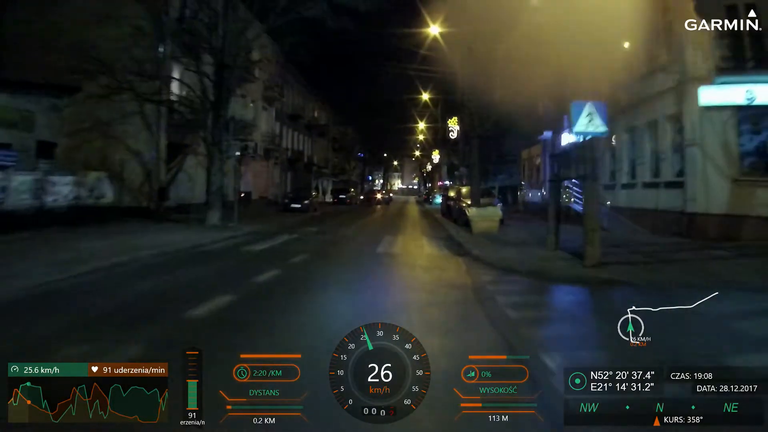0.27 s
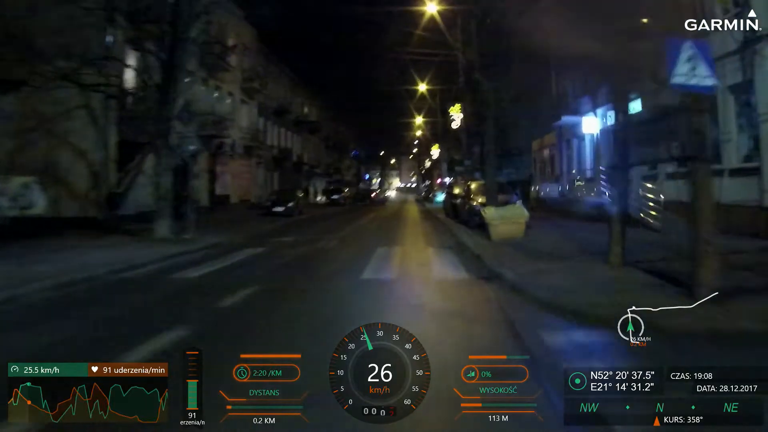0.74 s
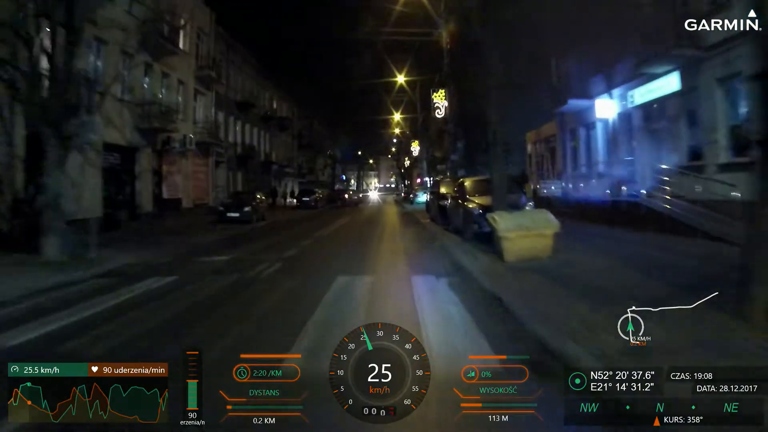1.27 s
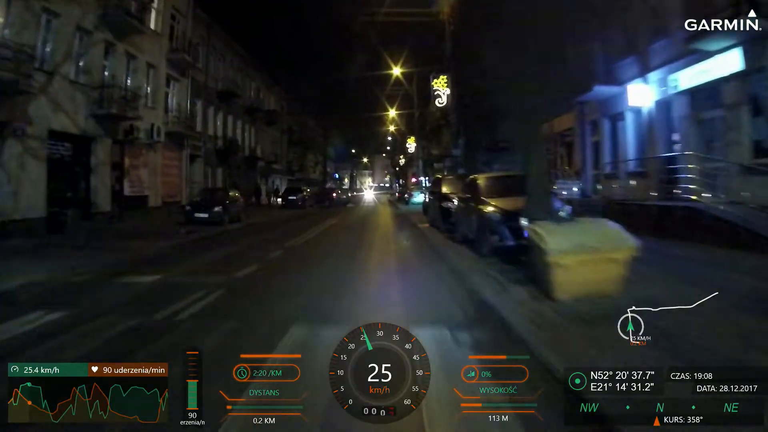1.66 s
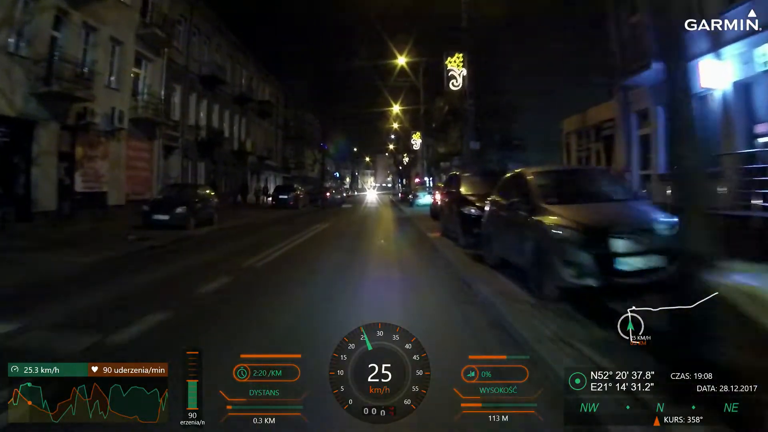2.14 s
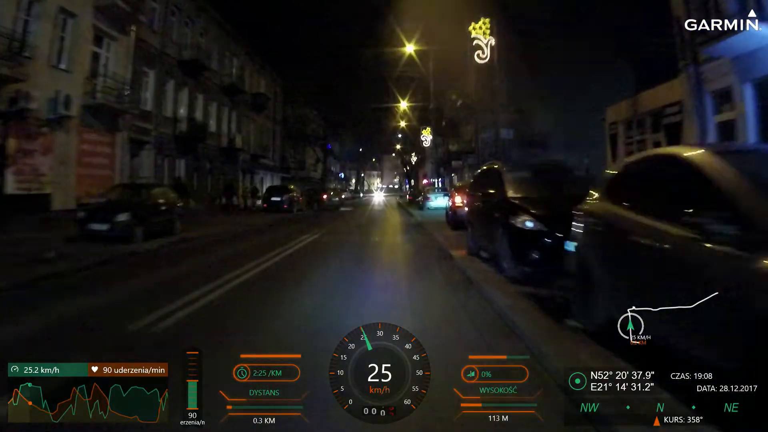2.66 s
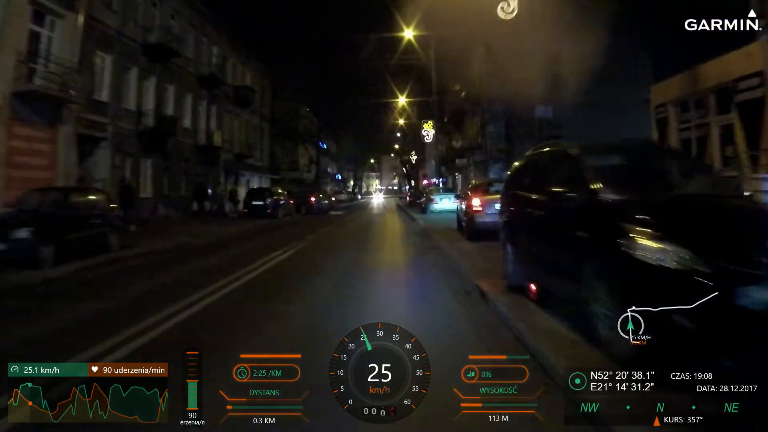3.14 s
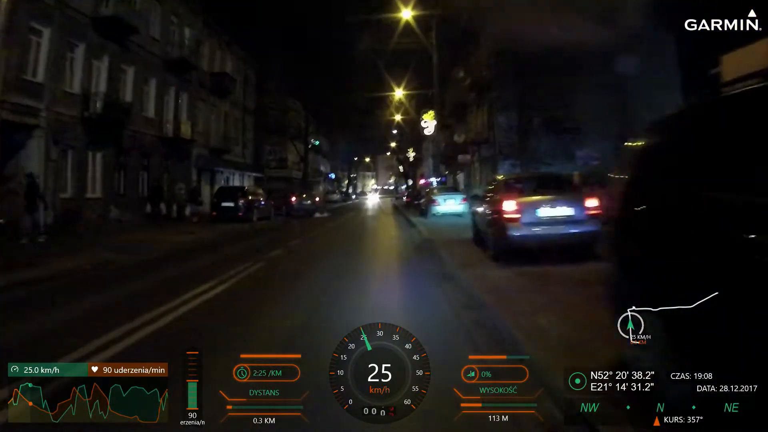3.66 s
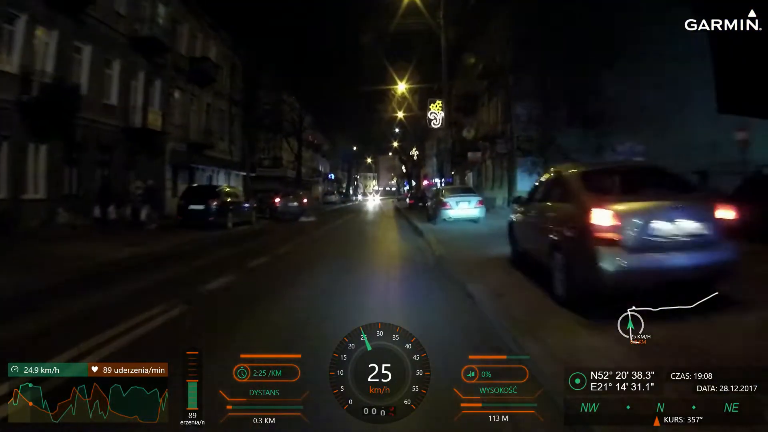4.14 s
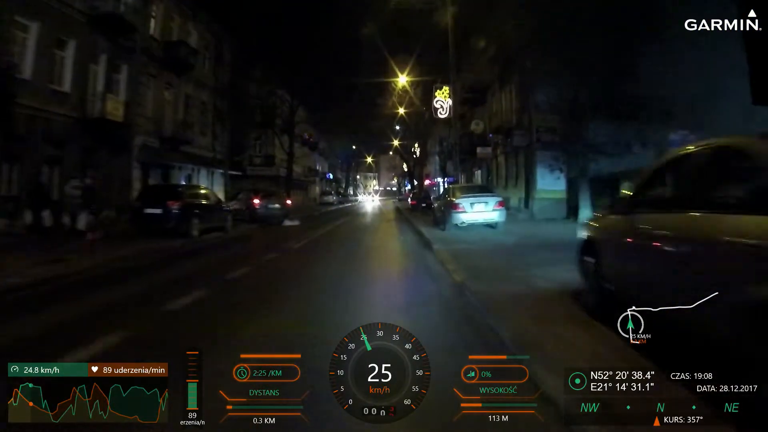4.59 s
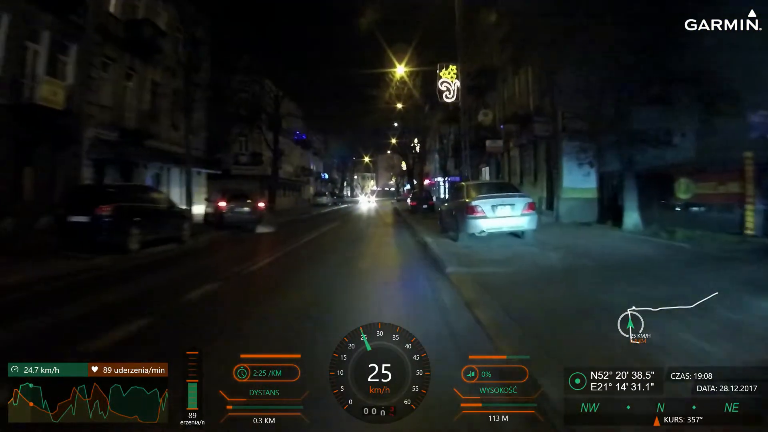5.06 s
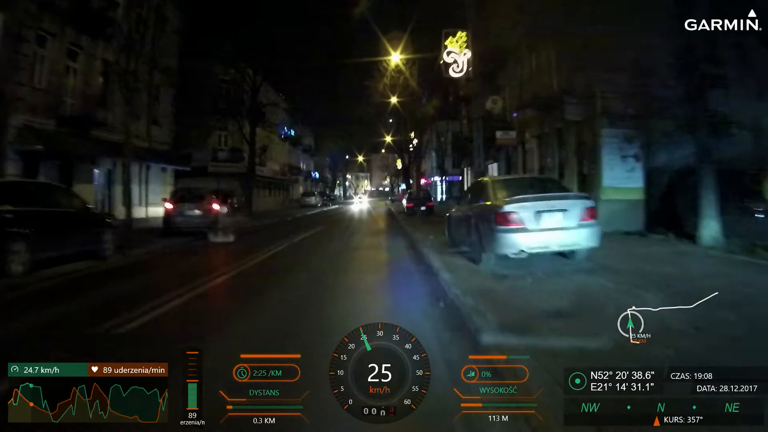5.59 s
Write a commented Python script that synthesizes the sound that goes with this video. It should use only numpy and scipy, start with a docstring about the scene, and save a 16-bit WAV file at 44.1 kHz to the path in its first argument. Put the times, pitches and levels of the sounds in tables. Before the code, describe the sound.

A steady scooter ride along a wet night street, recorded close and dry on the vehicle itself. Two neighbouring motor tones beat and surge over bumps, with buzzy overtones. Behind them run hollow road noise, hissing spray and low wind. Faint high electronic singing comes and goes, sprinkled with sharp little clicks; the tyre hiss turns brighter late on.

```python
"""A throbbing motor hum in a rush of tyre and road: an electric scooter rolls at an even speed along a wet
street, heard from a microphone fixed to it. The hub motor is a sum of sines on multiples of one base rate, its
main tones swelling with shaft and wheel. Frame, tyre hiss and wind are flickering bands of noise. The motor
controller sings faintly in the treble through narrow resonances; grit and drops tick on the housing."""
import sys
import numpy as np
from scipy import signal
from scipy.io import wavfile
from scipy.ndimage import uniform_filter1d

SR = 44100
rng = np.random.default_rng(int(sys.argv[2]) if len(sys.argv) > 2 else 0)


def to_wav(s):
    """Save 16-bit WAV."""
    ch = np.atleast_2d(s).T  # columns
    pcm = np.round(np.clip(ch, -1, 1) * 32767)  # PCM
    wavfile.write(sys.argv[1], SR, pcm.astype(np.int16))


N = 256662


def from_db(db):
    """Amplitude gain is ten to the power of decibels over 20."""
    return 10 ** (np.asarray(db) / 20)


def rms_one(x):
    """Normalise to unit effective value: divide by the root of the mean square."""
    return x / np.sqrt(np.mean(x ** 2) + 1e-20)


def in_time(rows):
    """Linear interpolation in time: each column after the first becomes one value per sample."""
    s, *columns = np.transpose(rows)
    return [np.interp(np.arange(N) / SR, s, c) for c in columns]


def drift(rate_hz):
    """Slow random fluctuation: white noise through two equal one-pole low-passes, rms 1."""
    step = 40   # samples between the slow values
    r = np.exp(-2 * np.pi * rate_hz * step / SR)
    white = rng.standard_normal(N // step + 2002)
    slow = signal.lfilter([1], [1, -2 * r, r * r], white)[2000:]   # drop the filter's start
    return np.interp(np.arange(N) / step, np.arange(len(slow)), rms_one(slow))


def band(x, low_hz, high_hz):
    """Butterworth band-pass: maximally flat between two corner frequencies."""
    return signal.sosfilt(signal.butter(2, [low_hz, high_hz], "band", fs=SR, output="sos"), x)


def banded_noise(spectrum, count, own_db, rate_hz):
    """Spectral shaping: log-spaced noise bands, each with its own level fluctuation; total rms 1."""
    hz, level_db = np.transpose(spectrum)
    edges = np.geomspace(hz[0], hz[-1], count)
    white = rng.standard_normal((2, N))   # neighbouring bands take different noise
    out = 0
    for k, (low, high) in enumerate(zip(edges, edges[1:])):
        centre_db = np.interp(np.log(low * high) / 2, np.log(hz), level_db)
        flicker_db = own_db * drift(rate_hz)
        out = out + from_db(centre_db + flicker_db) * band(white[k % 2], low, high)
    return rms_one(out)


def resonant_noise(peaks):
    """Resonance: noise passed twice through a two-pole filter per (pitch, width, level) row; rms 1."""
    out = 0
    for hz, width_hz, db in peaks:
        r = np.exp(-np.pi * width_hz / SR)
        poles = [1, -2 * r * np.cos(2 * np.pi * hz / SR), r * r]
        once = signal.lfilter([1, 0, -1], poles, rng.standard_normal(N))
        twice = signal.lfilter([1], poles, once)
        out = out + from_db(db) * rms_one(twice)
    return rms_one(out)


def base_cycles():
    """Phase is the running integral of frequency: cycles of the motor base rate gone by."""
    # motor base rate: columns [start_s, pitch_hz]
    speed = [(0, 91.0), (.6, 91.2), (2.3, 91.2), (2.8, 90.9), (4, 90.7), (5.82, 90.3)]
    return np.cumsum(in_time(speed)[0]) / SR


def swell(name):
    """Periodic modulation: a level swing in dB, once per wheel turn and once per motor shaft turn."""
    # swing of each layer: columns [wheel_db, wheel_peak_turns, shaft_db, shaft_peak_turns]
    swings = {"fifth": (0.7, 0.89, 1.85, 0.41), "sixth": (3.7, 0.96, 0.67, 0.3),
              "frame": (1.04, 0.69, 0.58, 0.29), "hiss": (1.9, 0.68, 0.21, 0.14),
              "whine": (1.9, 0.65, 0.97, .32)}
    wheel_db, wheel_at, shaft_db, shaft_at = swings[name]
    wheel_turns = base_cycles() / 31.25   # base cycles in one wheel turn
    shaft_turns = base_cycles() / 9       # base cycles in one shaft turn
    wheel_swing = wheel_db * np.cos(2 * np.pi * (wheel_turns - wheel_at))
    shaft_swing = shaft_db * np.cos(2 * np.pi * (shaft_turns - shaft_at))
    return wheel_swing + shaft_swing


def wind():
    """Turbulence: air on the microphone as mainly low-pitched noise of fluctuating level."""
    # shape of the wind spectrum: columns [pitch_hz, level_db per Hz, relative]
    wind_spectrum = [(15, -33), (28, -24), (45, -1), (64, -1.5), (160, 1.5), (227, -3.5), (330, -11)]
    # wind swell: columns [start_s, level_db]
    gust = [(0, -0.5), (5.2, -1), (5.82, 5.5)]
    wind_db = -34.5 + in_time(gust)[0] + 2.1 * drift(7.7)
    return from_db(wind_db) * banded_noise(wind_spectrum, count=12, own_db=0.4, rate_hz=7.1)


def ticks():
    """Impulse excitation: grit and drops click on the housing with short noisy tails, bright and dull."""
    # single ticks: columns [start_s, level_db before filtering, dull_db relative to the bright part]
    tick_rows = [(0.4718, -44, -7), (0.5914, -28, -12), (0.6379, -30, -13), (0.844, -34, -1),
                 (1.023, -29, -4), (1.1657, -34, -5), (1.3575, -42, 8), (1.5725, -22, -13),
                 (1.677, -31, -4), (1.7145, -40, -2), (1.7564, -37, -8), (1.8423, -23.5, -3),
                 (1.916, -35, -15), (2.6274, -30, -13), (2.7924, -45, 9), (2.9628, -23, -2),
                 (3.1916, -39, -17.5), (3.3194, -32, 2), (3.901, -30, -9), (4.0811, -30, -14),
                 (4.2063, -34, -8), (4.4209, -38, -5), (4.6349, -24, -12), (4.6543, -44, 4),
                 (5.188, -35, -3.5), (5.3475, -20, -2), (5.4415, -38, 5), (5.5936, -25, -7)]
    bright, dull = np.zeros((2, N))
    for s, db, dull_db in tick_rows:
        at = round((s + .0012) * SR)   # the click follows the listed start by 1.2 ms
        bright[at], dull[at] = from_db(db), from_db(db + dull_db)
    # small random clicks fill in between, on average 45 per second
    small_db = -49.5 + 3.5 * np.minimum(rng.exponential(1, N), 3)
    small = (rng.random(N) < 45 / SR) * from_db(small_db)
    noise = rng.standard_normal((2, N))

    def burst(clicks, tail_noise, decay_s):
        """Exponential decay: each click is followed by a fading tail of noise."""
        envelope = signal.lfilter([1], [1, -np.exp(-1 / (decay_s * SR))], clicks + 1e-18)
        return clicks + 0.16 * tail_noise * envelope
    bright_burst = burst(bright + small, noise[0], decay_s=0.00044)
    dull_burst = burst(dull + from_db(-7.5) * small, noise[1], decay_s=0.0008)
    # the gains make up for what the bands take away
    return from_db(9.0) * band(bright_burst, 6000, 16500) + from_db(16.5) * band(dull_burst, 1200, 5000)


def load():
    """Superposition: whine level in dB as an even load plus bell-shaped pushes."""
    # whine at even load: columns [start_s, level_db]
    even_load = [(0, -59), (1.0, -59.5), (3.3, -55.5), (5.82, -59)]
    # the load rises for a moment and the whine flares: columns [centre_s, rise_db, spread_s (standard deviation)]
    pushes = [(1.28, 6.5, 0.099), (2.3, 4.5, 0.067), (2.62, 0.5, .05), (2.95, 8, 0.081), (3.65, 4, 0.073),
              (4.03, 3, 0.025), (4.63, 5, 0.058), (4.94, 6.5, 0.085)]
    t = np.arange(N) / SR
    return in_time(even_load)[0] + sum(db * np.exp(-.5 * ((t - s) / spread_s) ** 2) for s, db, spread_s in pushes)


def controller(whine_db):
    """Narrow-band resonance: blurred switching tones follow the load, with broad bands and a falling tone."""
    # switching tones: columns [pitch_hz, width_hz, level_db relative]
    whine_peaks = [(7787, 22, -8), (7855, 20, -8), (8150, 6, -2), (8210, 14, -3), (8456, 14, -15),
                   (8696, 10, -8), (8820, 14, -16), (9061, 14, -18), (9674, 25, -19)]
    # broad bands that flare under load: columns [pitch_hz, width_hz, level_db relative]
    flare_peaks = [(7770, 420, -4), (8260, 550, 0)]
    # faint falling whistle: columns [start_s, pitch_hz, level_db]
    whistle_rows = [(3.2, 10160, -85), (3.4, 10152, -69), (4.0, 10125, -68), (4.4, 10065, -63),
                    (4.9, 9960, -76)]
    mean_db = whine_db.mean()
    load_db = whine_db - mean_db
    tones = from_db(mean_db - 1.4 + 1.06 * load_db) * resonant_noise(whine_peaks)
    flare = from_db(mean_db - 5.5 + 0.9 * load_db) * resonant_noise(flare_peaks)
    hz, db = in_time(whistle_rows)
    db = np.where(np.arange(N) < whistle_rows[-1][0] * SR, db, -np.inf)   # silent after the last row
    whistle = from_db(db + 2.5 * drift(8.0)) * np.sin(2 * np.pi * np.cumsum(hz) / SR)
    return tones + flare + whistle


def tyre_hiss(hiss_db, jolts):
    """Broadband spray noise: wet tyres hiss, level modulated by wheel, shaft and jolts."""
    # shape of the wet tyre spray: columns [pitch_hz, level_db per Hz, relative]
    hiss_spectrum = [(1100, -8), (1600, -3.5), (2100, -7), (3000, -17), (3600, -15.5), (4400, -21),
                     (5200, -21), (7000, -26.5), (9500, -27), (13500, -29.5), (15200, -28.5)]
    # a wetter stretch brightens the hiss: columns [start_s, added_share of treble]
    spray = [(0, -.1), (3.5, 0.042), (4.8, 0.55), (5.82, 0.37)]
    level = from_db(hiss_db + swell("hiss") + 1.0 * jolts)
    hiss = level * banded_noise(hiss_spectrum, count=20, own_db=1.07, rate_hz=19.0)
    return hiss + in_time(spray)[0] * band(hiss, 6000, 15000)


def frame_rumble(hiss_db, jolts):
    """Structure-borne sound: the road excites the frame, whose level largely follows the tyres."""
    # frame response to the road: columns [pitch_hz, level_db per Hz, relative]
    frame_response = [(200, -29.5), (330, -6.5), (400, -0.5), (500, 4.5), (600, -0.5), (690, -8), (780, -1),
                      (880, 0.5), (1000, -6.5), (1080, -13), (1260, -30), (1370, -27.5), (1500, -30),
                      (2000, -42.5)]
    sinking_db = 0.31 * np.arange(N) / SR   # slow loss, 0.31 dB per second
    rumble_db = -20.5 + 0.94 * (hiss_db - hiss_db.mean()) - sinking_db
    level = from_db(rumble_db + swell("frame") + 1.74 * jolts)
    return level * banded_noise(frame_response, count=30, own_db=1.15, rate_hz=15.0)


def surges():
    """Amplitude modulation: bell-shaped rises and falls in dB of the fifth and sixth multiple."""
    # short surges over bumps, and brief drop-outs: columns [centre_s, fifth_db, sixth_db]
    surge_rows = [(0.351, 3.5, 3.5), (0.459, -3.5, -2), (.531, 4.5, -7), (.621, 5.5, -7.5), (1.03, 2, 1.5),
                  (1.181, -11, -0.5), (1.333, 2.5, 7.5), (1.642, 4, 1.5), (1.855, 2.5, -9), (2.037, 8.5, 5),
                  (2.33, -6, 5.5), (2.395, 6, 2.5), (2.678, 6.5, 3), (2.98, 0.5, 9), (3.179, 6.5, -1.5),
                  (3.243, -13.5, -8), (3.433, 3.5, 3), (3.533, -11.5, 0.5), (3.619, 6.5, 7),
                  (3.729, 10.5, 6), (4.062, 4.5, 3.5), (4.335, 9, 2.5), (4.679, 7, 3.5), (5.088, 3.5, 5.5),
                  (5.174, 3.5, 3), (5.243, -5.5, 0.5), (5.421, -6.5, 0.5), (5.465, 8, 1.3),
                  (5.627, -6, 1.5), (5.719, -5.5, -11), (5.814, 12, 3)]
    spread_s = 0.021   # standard deviation of each bell
    t = np.arange(0, N, 40) / SR
    s, *db = np.transpose(surge_rows)
    bells = np.array(db) @ np.exp(-.5 * ((t - s[:, None]) / spread_s) ** 2)
    return [np.interp(np.arange(N) / SR, t, row) for row in bells]


def motor():
    """Harmonic synthesis: sines on multiples of the base rate; the road shakes their level and phase."""
    # slow level of the fifth multiple between surges: columns [start_s, level_db]
    fifth_level = [(0, -20.5), (4.3, -22), (5.82, -25)]
    # weaker motor tones: columns [multiple, level_db]
    overtone_rows = [(3, -40.5), (9, -41.5), (13, -51)]
    fifth_surge_db, sixth_surge_db = surges()
    fifth_db = in_time(fifth_level)[0] + fifth_surge_db + swell("fifth")
    sixth_db = -22 + sixth_surge_db + swell("sixth")

    def tone(multiple, db, shake_db, jitter_rad):
        """Amplitude and phase modulation of one sine by slow random fluctuations."""
        phase = 2 * np.pi * multiple * base_cycles() + jitter_rad * drift(18.0)
        shaken_db = db + shake_db * np.clip(drift(23.0), -3, 1.6)
        return np.sqrt(2) * from_db(shaken_db) * np.sin(phase)   # root two: the level is that of the rms
    fifth = tone(5, fifth_db, shake_db=2.5, jitter_rad=0.36)
    sixth = tone(6, sixth_db, shake_db=2.5, jitter_rad=0.32)
    # the part that rings at the fifth multiple is driven past its linear range: 2nd and 3rd harmonics
    second = 0.68 * band(fifth ** 2, 800, 1000)
    third = 0.047 * band(np.tanh(8.8 * fifth), 1280, 1460)
    weaker = sum(tone(round(k), db, shake_db=4.5, jitter_rad=0.77) for k, db in overtone_rows)
    return fifth + sixth, second + third + weaker


def scene():
    """Superposition of wind, ticks, controller, tyres, frame and motor at one microphone."""
    # level of the tyre hiss, apart from swell and jolts: columns [start_s, level_db]
    roll = [(0, -47), (.3, -44), (.43, -49), (.65, -46.5), (1.3, -46.5), (2.3, -45.5), (2.75, -46.5),
            (2.95, -45), (3.7, -46), (3.85, -47.5), (4.1, -45.5), (4.5, -45), (4.65, -42.5), (4.8, -47.5),
            (4.97, -42), (5.15, -47.5), (5.45, -44), (5.82, -43.5)]
    hiss_db, = in_time(roll)
    hum, overtones = motor()
    hum_db = 10 * np.log10(uniform_filter1d(hum ** 2, size=600) + 1e-4)   # running power of the hum
    # road unevenness and the hum's own surges shake frame, tyres and motor load alike
    jolts = drift(6.1) + 0.15 * (hum_db - hum_db.mean())
    whine = controller(load() + swell("whine") + 1.3 * jolts)
    hiss = tyre_hiss(hiss_db, jolts)
    frame = frame_rumble(hiss_db, jolts)
    return (wind() + ticks() + whine + hiss + frame + hum + overtones)[None]


def record(dry):
    """Quadratic distortion: the shaken microphone bends the loud hum, adding sum tones; the top is cut."""
    low = signal.sosfilt(signal.butter(2, 1200, fs=SR, output="sos"), dry)
    bent = dry + 0.068 * band(low ** 2, 990, 2700)
    # steep low-pass: 70 dB down from 15820 Hz upwards
    return signal.sosfilt(signal.cheby2(16, 70, 15820, fs=SR, output="sos"), bent)


dry = scene()
out = record(dry)
to_wav(out)
```